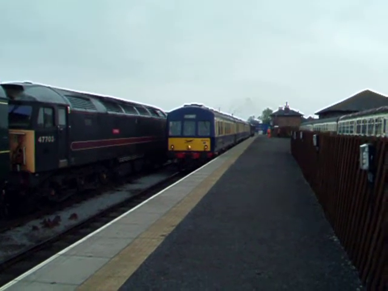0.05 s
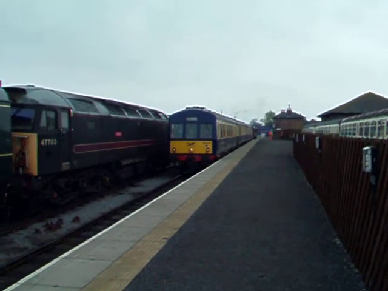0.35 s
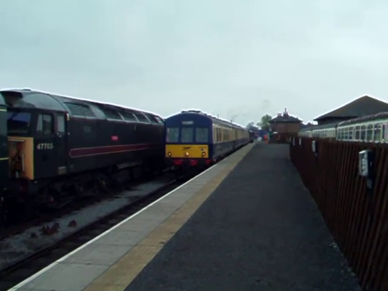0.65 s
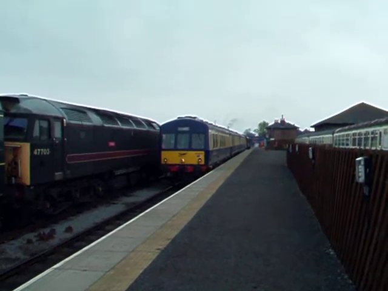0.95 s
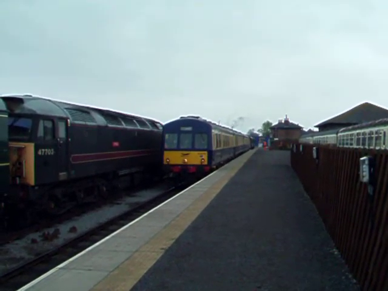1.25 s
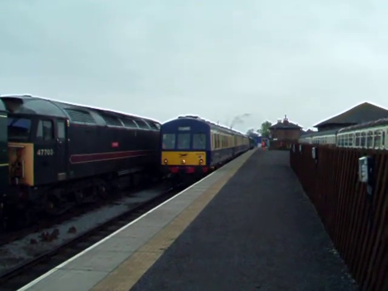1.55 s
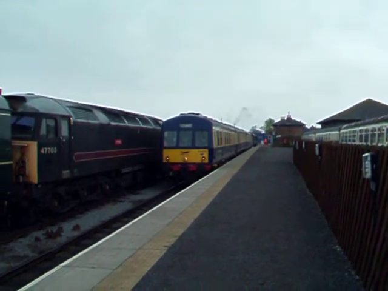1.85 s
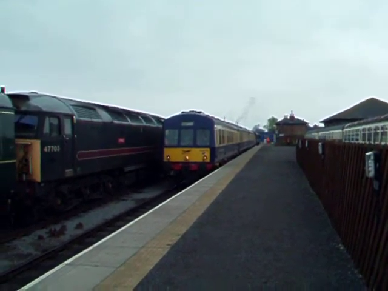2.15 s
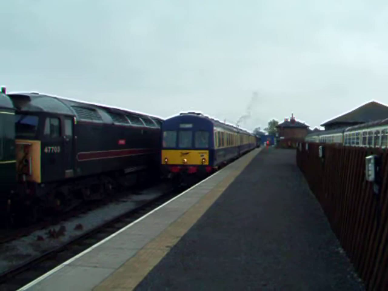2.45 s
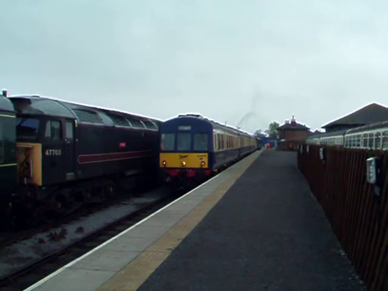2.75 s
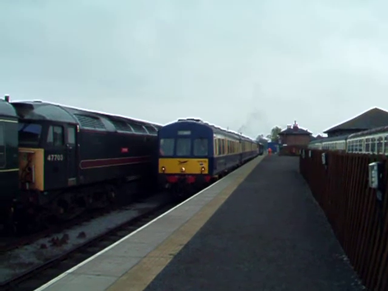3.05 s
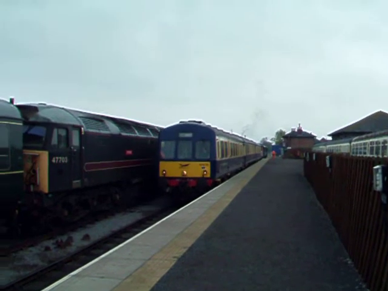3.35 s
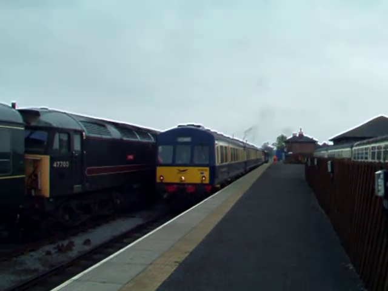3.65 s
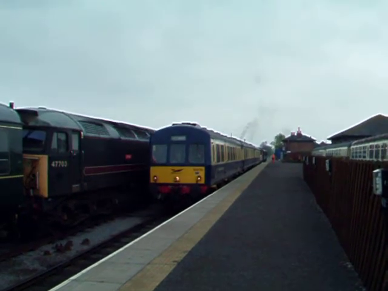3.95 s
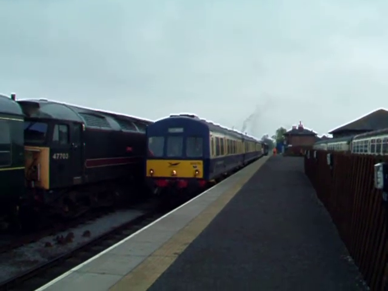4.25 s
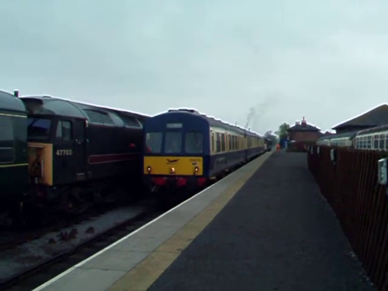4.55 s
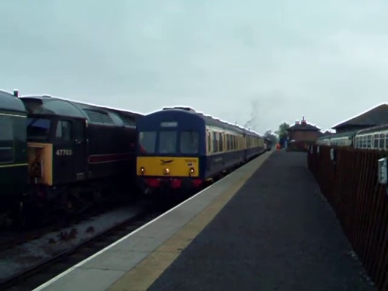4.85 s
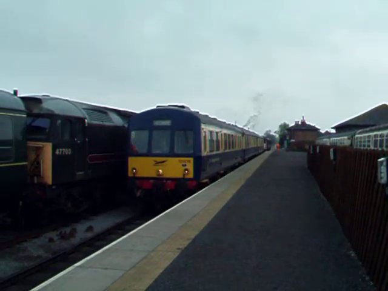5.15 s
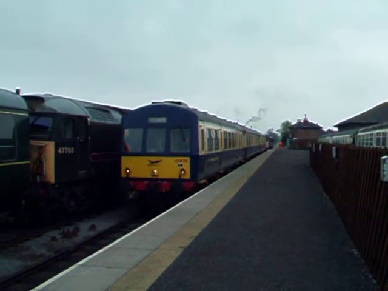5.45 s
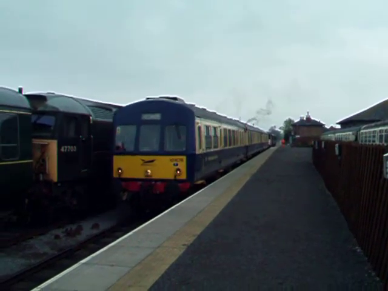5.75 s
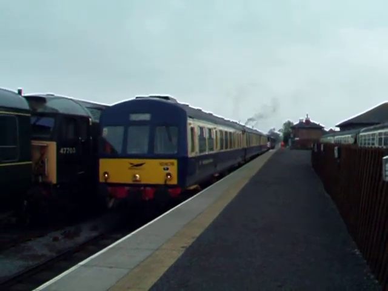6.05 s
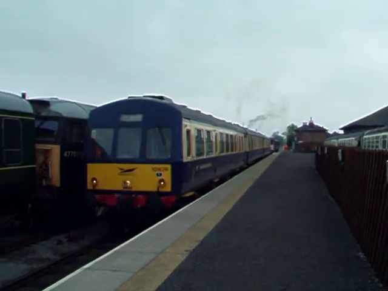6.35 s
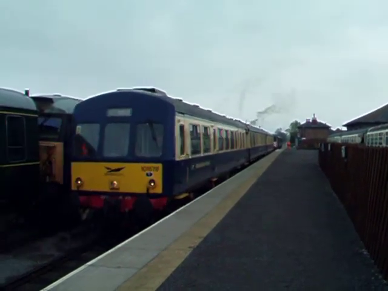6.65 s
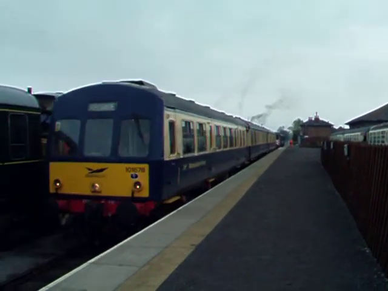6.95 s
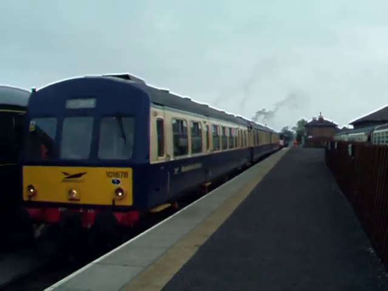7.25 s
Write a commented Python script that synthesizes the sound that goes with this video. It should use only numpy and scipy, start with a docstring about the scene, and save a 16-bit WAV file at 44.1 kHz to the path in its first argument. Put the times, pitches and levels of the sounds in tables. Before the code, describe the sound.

A diesel railcar drones and rumbles as it moves along an open station platform towards the microphone, with a light clatter, hiss and a faint high whine. Wind buffets the microphone throughout, with irregular flaps and pops that are strongest from about 1 to 3 seconds and sparser later. From around 3 seconds the train grows steadily louder. Between 4 and 6 seconds its two engines speed up, their drone rising in pitch and swelling in surges while clatter, hiss and ringing metal panels build. A few sharp metal cracks come at about 5 seconds. Brief high chirps from the running gear follow, near 5, 6 and 7 seconds. At about 7.2 seconds a wheel knocks over a rail joint, and the train is at its closest and loudest as the sound ends just after.

```python
"""A diesel railcar pulls out along a station platform and comes towards the microphone. Its two underfloor
engines drone through their exhaust pipes and speed up under a growing clatter and hiss. Panels ring, the
exhaust cracks, metal chirps, and a wheel knocks over a rail joint. All the while, gusts of wind push small
swirls of air across the microphone, which flap and pop."""
import sys
import numpy as np
from scipy import signal
from scipy.fft import rfft, irfft
from scipy.io import wavfile
from scipy.ndimage import uniform_filter1d

SR = 44100
rng = np.random.default_rng(int(sys.argv[2]) if len(sys.argv) > 2 else 0)


def digitize_waveform(pressure):
    """Quantize a signal to 16-bit integers and store it at the path in sys.argv[1].

    Rows of a 2-D input are taken as channels; values are limited to [-1, 1].
    """
    field = np.atleast_2d(pressure).T
    bounded = np.clip(field, -1, 1)
    quanta = np.round(bounded * 32767).astype(np.int16)
    wavfile.write(sys.argv[1], SR, quanta)


N = 325899
T = np.arange(N) / SR

# How fast each engine runs. Each row: time in seconds, firings per second.
FRONT_SPEED = [(0, 30.5), (2.6, 31.2), (4.1, 34.8), (4.6, 37.3), (4.95, 39.8), (5.2, 40.8), (6.1, 46.4),
               (6.6, 44.6), (7.39, 45.4)]
REAR_SPEED = [(0, 31.8), (3, 32.6), (4.2, 37), (5.0, 44.8), (5.3, 47), (5.65, 49), (7.39, 51.1)]
# When each engine's exhaust drone swells louder.
# Each row: start in seconds, length in seconds, level in dB.
FRONT_SWELLS = [(4.08, .55, -27), (4.93, 0.2, -25.5), (5.8, 0.32, -26.5), (6.9, 0.11, -23.5)]
REAR_SWELLS = [(5.3, 0.38, -26), (5.85, .4, -29.5), (6.85, 1, -29.5)]
# Where an exhaust pipe rings. Each row: pitch before tuning in Hz, width in Hz, relative level in dB.
PIPE_RINGS = [(191, 48.4, 8), (45.7, 14, -10.5), (320, 100, -25.5), (490, 140, -26)]
# The train gets louder as it comes closer. Each row: time in seconds, relative level in dB.
APPROACH = [(0.0, -48), (1.48, -43.5), (2.0, -49), (2.7, -45.5), (3.15, -47), (5.18, -39), (6.81, -37),
            (7.39, -33.5)]
# The tone colours of four engine noises. Each row: frequency in Hz, relative level in dB.
RUMBLE_COLOUR = [(18, -13.5), (32, -13.5), (60, -7.5), (100, -7), (135, 1.5), (185, 2.5), (260, -1.5),
                 (400, -7.5), (600, -12), (850, -11.5), (1300, -23.5), (2500, -64.5)]
CLATTER_COLOUR = [(300, 9.5), (750, 4.5), (950, -1.5), (1120, 5), (1350, 6), (1620, 6.5), (1950, 3),
                  (2330, 4), (2560, -9), (2720, -17), (3100, -21), (4500, -40)]
HISS_COLOUR = [(1500, 3), (2600, -1.5), (3100, 0.5), (3370, 1.5), (3600, 4), (4000, 3.5), (4600, 1),
               (5100, -16), (5800, 4), (6250, 3), (7300, 0), (8000, -6.5), (8500, -17.5), (8950, -39)]
AIR_RUSH_COLOUR = [(3100, -32), (3300, -3.5), (3430, -10), (3650, -22), (4400, -18), (4750, -1.5),
                   (4950, 0.5), (5400, 1.5), (5600, -3.5), (6000, -40)]
# Where panels and pipework ring. Each row: pitch in Hz, width in Hz, relative level in dB.
PANEL_RINGS = [(820, 160, -4.5), (1112, 110, -2.5), (1670, 170, -10), (2232, 260, -6.5), (2524, 120, -9),
               (3250, 370, -18.5), (3900, 36, -17.5), (4340, 39, -22.5), (5005, 330, -11.5)]
# Cracks of the exhaust, and wheel blows on the rail joint. Each row: start in seconds, level in dB.
CRACKS = [(4.928, -22), (4.953, -15.5), (5.0035, -11.5), (5.152, -17.5)]
JOINT_BLOWS = [(7.159, -18), (7.173, -13.5), (7.185, -17), (7.22, -24)]
# The tone colour of the exhaust cracks, and how wheel and rail ring. Each row: frequency in Hz, relative level
# in dB.
CRACK_COLOUR = [(100, -11), (250, 3), (550, -4), (850, 15.5), (1050, 0), (1200, 3), (1600, -8), (1900, 4.5),
                (2300, 1.5), (2560, -14), (2800, -30), (4500, -43)]
WHEEL_COLOUR = [(120, -18), (220, 4.5), (330, 19.5), (480, -22), (800, 2), (1400, 5), (2300, -2),
                (2900, -8.5), (3900, -2.5), (4500, -3.5), (5300, -8), (6400, -11), (8000, -27), (8900, -49)]
# Chirps of the running gear. Each row: time of the peak in seconds, level in dB.
CHIRPS = [(2.775, -38), (5.12, -34), (5.79, -32), (5.95, -33), (6.94, -29), (7.04, -28), (7.26, -30)]
# The tones of a faint whine. Each row: pitch in Hz, level in dB.
WHINE_TONES = [(3118, -64.5), (3705, -67), (5022, -76.5), (6568, -58.5), (7156, -66.5)]
# The hardest flaps of wind. Each row: start in seconds, length in seconds, level in dB,
# brightness in Hz (each swirl's own brightness is scaled from it).
FLAPS = [(.045, .04, -24.5, 490), (.287, 0.0062, -22, 590), (0.336, 0.054, -26, 440),
         (1.009, .02, -22, 248), (1.076, 0.019, -17, 362), (1.102, .04, -21, 363), (1.202, 0.021, -19, 310),
         (1.308, 0.04, -21.5, 390), (1.478, 0.016, -18.5, 564), (1.504, 0.0051, -9, 420),
         (1.527, 0.0091, -13, 444), (1.569, 0.04, -18.5, 460), (1.615, .02, -13.5, 590),
         (1.644, .018, -15, 537), (1.663, 0.0035, -9, 990), (1.708, 0.0061, -20.5, 776),
         (1.826, 0.0072, -15.5, 610), (1.838, 0.0089, -26, 870), (1.906, .03, -23.5, 514),
         (2.029, 0.016, -15.5, 770), (2.047, 0.014, -16.5, 840), (2.138, .009, -24, 530),
         (2.167, 0.057, -22, 440), (2.233, .009, -22.5, 310), (2.29, 0.0075, -23, 553),
         (2.529, .006, -14.5, 550), (2.594, 0.041, -24, 430), (2.716, 0.0095, -13.6, 670),
         (2.727, .027, -19.5, 610), (2.828, 0.033, -19, 348), (2.869, 0.0089, -15.5, 765),
         (2.895, 0.015, -17, 710), (2.929, 0.058, -16.5, 605), (3.184, 0.01, -15.5, 510),
         (3.261, .018, -21.5, 325), (3.305, .04, -21.5, 430), (3.409, 0.039, -21.5, 610),
         (3.495, 0.02, -25.5, 400), (3.62, .04, -24.5, 540), (3.817, .2, -25.5, 500),
         (4.019, .01, -26, 790), (4.14, 0.033, -20, 450), (4.255, .01, -20.5, 670),
         (4.447, 0.0098, -16.5, 590), (4.558, .045, -22, 278), (4.771, 0.028, -20.5, 196),
         (4.896, .043, -21.5, 280), (5.807, .037, -17.5, 356), (6.147, .008, -19, 260),
         (6.417, 0.015, -15, 350), (6.86, 0.049, -24, 540)]
# Gusts. Each row: start in seconds, length in seconds, relative buffeting and flutter levels in dB.
GUSTS = [(0, 0.53, -34, -31.5), (1.04, 0.59, -21.5, -30.5), (1.692, 0.11, -35, -27.5),
         (2.542, 0.66, -39, -30.5), (3.05, .55, -43, -31), (3.78, 0.43, -26, -22.5),
         (4.65, 0.42, -28.5, -30.5), (5.2, 0.27, -27.5, -37.5), (6.101, 0.23, -26, -34.5),
         (6.864, 0.23, -25.5, -27)]
# The tone colour of the wind's low buffeting. Each row: frequency in Hz, relative level in dB.
BUFFET_COLOUR = [(12, -25.5), (28, -0.5), (50, 9.5), (100, 15), (170, 9.5), (300, -4.5), (700, -52.5)]


def exhaust(firings, drone_level, tuning, roughness=0.35, waver_db=3.0):
    """Multiples of the firing rate swell as they climb through the pitches at which the pipe rings."""
    firing_hz, drone = np.gradient(firings) * SR, np.zeros(N)
    for harmonic in range(1, 14):
        power = sum(amp(2 * db) / (1 + (2 * (harmonic * firing_hz - hz * tuning) / width) ** 2) ** 2
                    for hz, width, db in PIPE_RINGS)
        drone += np.sqrt(power) * np.cos(2 * np.pi * (harmonic * firings + rng.random()))
    drone /= np.sqrt(uniform_filter1d(drone ** 2, size=8000))  # even out the level; the swells set it
    strength = 1 + roughness * drift(72)  # no two firings are equally strong
    return drone * strength * drone_level * amp(waver_db * drift(22))


def count_firings(speed):
    """Counts how often an engine's cylinders have fired so far; its speed wanders a little."""
    return np.cumsum(curve(speed) * (1 + .008 * drift(14))) / SR


def machinery(firings, drone_level, beat_depth=0.15, throb_hz=8.3):
    """Rumble swells with the drone, clatter and rushing air beat with the firings, hiss lies on top."""
    beat = 1 + beat_depth * np.cos(2 * np.pi * firings)
    near_db = nearness()  # each noise grows with this at its own rate
    rumble = noise(RUMBLE_COLOUR) * amp(-31 + .87 * near_db) * unit(drone_level) ** .29
    clatter = noise(CLATTER_COLOUR) * beat * amp(-34.5 + .86 * near_db + .6 * drift(8.6))
    hiss = noise(HISS_COLOUR) * amp(-43 + near_db)
    throb = np.sin(2 * np.pi * np.cumsum(throb_hz * (1 + .3 * drift(4))) / SR)
    flutter = amp(1.7 * throb + 1.5 * drift(25))
    air_rush = noise(AIR_RUSH_COLOUR) * beat * flutter * amp(-46 + 1.05 * near_db)
    return rumble + clatter + hiss + air_rush


def nearness():
    """How many dB the train's approach lies above its average."""
    db = curve(APPROACH)
    return db - db.mean()


def panels(rattle_db=3.0):
    """The shaking of the engines keeps metal panels ringing, each swelling on its own."""
    rings = sum(ringing(hz, width) * amp(db + rattle_db * drift(20)) for hz, width, db in PANEL_RINGS)
    return rings * amp(-44 + .99 * nearness())


def ringing_blows(rows, ring_colour, fade_s, rise_s=0.00044, samples=12000):
    """Each blow sets off a dense ring that drops by 60 dB in fade_s seconds."""
    out, t = np.zeros(N), T[:samples]
    for start, db in rows:
        ring = colour(rng.standard_normal(samples), ring_colour)
        add(out, start, ring * amp(db - 60 * t / fade_s) * (1 - np.exp(-t / rise_s)))
    return out


def chirps(hz=5300, width_hz=280, swell_s=0.003):
    """The running gear chirps in short swells of a high, fuzzy metal ring."""
    f = np.fft.rfftfreq(N, 1 / SR)
    band = np.exp(-((f - hz) / width_hz) ** 2)
    ring = unit(irfft(rfft(rng.standard_normal(N)) * band, N))
    return ring * sum(amp(db) * np.exp(-((T - peak) / swell_s) ** 2) for peak, db in CHIRPS)


def gear_whine(waver_db=3):
    """A thin, fuzzy whine, perhaps of the gears, that stands out as the train comes near."""
    return ringing(hz=3380, width_hz=70) * amp(-59 + 1.55 * nearness() + waver_db * drift(11))


def steady_whine():
    """Faint, high tones that never change."""
    return sum(np.sqrt(2) * amp(db) * np.sin(2 * np.pi * (hz * T + rng.random()))
               for hz, db in WHINE_TONES)


def wind_flaps(swirls_per_s=520, ragged_db=5, arch_db=3, lead_db=3, lead_s=.005):
    """A flap is a tight bunch of air swirls: the strongest sound sharp, the weakest dull."""
    out, lead_in = np.zeros(N), 600  # samples of room before each flap
    for start, length, db, hz in FLAPS:
        count = max(1, round(length * swirls_per_s))
        along = (np.arange(count) + rng.uniform(.1, .9, count)) / count  # 0 to 1 through the flap
        scatter_db = ragged_db * np.clip(rng.standard_normal(count), -2, 2)
        sizes = amp(scatter_db + arch_db * np.sin(np.pi * along))
        sizes *= amp(lead_db * np.exp(-along * length / lead_s))  # the first swirls get an extra push
        arrivals = lead_in + (along * length * SR).astype(int)
        burst = np.zeros(4096 + int(length * SR))
        strong_to_weak = np.array_split(np.argsort(-sizes), 3)
        for group, speed in zip(strong_to_weak, (1.25, .68, .34)):
            kicks = np.zeros(len(burst))
            kicks[arrivals[group]] = sizes[group] * rng.choice([-1, 1], len(group))
            burst += swirls(kicks, hz * .93 * speed) / speed ** 1.27  # slow swirls push for longer
        add(out, start - lead_in / SR, unit(burst) * np.sqrt(length * SR / len(burst)) * amp(db))
    return out


def wind_gusts(flutter_hz=400, swirls_per_s=320, lump_db=0.85, clump_db=4.5):
    """Each gust brings low, lumpy buffeting and a flutter of small swirls that come in clumps."""
    gusts = np.array(GUSTS)
    buffet_gain = swells(gusts[:, [0, 1, 2]], rest_db=-37.5, rise_s=.082, fall_s=.085)
    flutter_gain = swells(gusts[:, [0, 1, 3]], rest_db=-44, rise_s=.082, fall_s=.085)
    buffet = noise(BUFFET_COLOUR) * buffet_gain * amp(lump_db * drift(30))
    clumps = amp(clump_db * np.clip(drift(60), -2, 2))
    kicks = rng.choice([-1, 1], N) * (rng.random(N) < swirls_per_s / SR) * clumps
    flutter = unit(swirls(kicks, flutter_hz)) * flutter_gain
    return (buffet + flutter) * amp(-2)


def swirls(kicks, hz, leak_hz=125):
    """Each swirl crossing the microphone is one smooth pressure swing; fast ones are brighter."""
    f = np.fft.rfftfreq(len(kicks), 1 / SR)
    leak = (1j * f / (leak_hz + 1j * f)) ** 2  # slow swings leak away
    swing = 1j * (f / hz) ** .35 * np.exp(-.5 * (f / hz) ** 1.65)
    lag = (hz - 1j * f) / (hz + 1j * f)  # the lows trail the sharp edge
    return irfft(rfft(kicks) * leak * swing * lag, len(kicks))


def swells(rows, rest_db, rise_s, fall_s):
    """A gain that rises from rest, holds and falls back for each row of start, length and level."""
    gain = amp(rest_db)
    for start, length, db in rows:
        shape = np.exp(np.minimum(T - start, 0) / rise_s - np.maximum(T - start - length, 0) / fall_s)
        gain = np.hypot(gain, amp(db) * shape)
    return gain


def ringing(hz, width_hz):
    """Noise narrowed to a fuzzy tone around one pitch."""
    f = np.fft.rfftfreq(N, 1 / SR)
    return unit(irfft(rfft(rng.standard_normal(N)) / (1 + ((f - hz) / width_hz * 2) ** 2), N))


def noise(outline):
    """Steady noise of a given tone colour."""
    return colour(rng.standard_normal(N), outline)


def colour(sound, outline):
    """Shapes a sound's lows and highs by a colour table, at an average size of 1."""
    hz, db = np.transpose(outline)
    f = np.fft.rfftfreq(len(sound), 1 / SR)
    gain = amp(np.interp(np.log(f + 1), np.log(hz), db))
    return unit(irfft(rfft(sound) * gain, len(sound)))


def drift(rate, points=4096):
    """A random wobble of average size 1, with up to about rate changes a second."""
    f = np.fft.rfftfreq(points, T[-1] / points)
    slow = irfft(rfft(rng.standard_normal(points)) * np.exp(-(f / rate) ** 2) * (f > 0))
    return np.interp(T, np.linspace(0, T[-1], points), unit(slow))


def curve(rows):
    """Joins rows of time and value with straight lines."""
    return np.interp(T, *np.transpose(rows))


def amp(db):
    """Turns decibels into a gain."""
    return 10 ** (np.asarray(db) / 20)


def unit(sound):
    """Scales a sound to an average size (root mean square) of 1."""
    return sound / np.sqrt(np.mean(sound ** 2) + 1e-20)


def add(mix, start_s, sound):
    """Mixes a sound in at its start time."""
    part = mix[max(round(start_s * SR), 0):][:len(sound)]
    part += sound[:len(part)]


def scene():
    """The train, its knocks and the wind, at one microphone."""
    front, rear = count_firings(FRONT_SPEED), count_firings(REAR_SPEED)
    front_level, rear_level = (swells(rows, rest_db=-43, rise_s=.096, fall_s=.11)
                               for rows in (FRONT_SWELLS, REAR_SWELLS))
    drone = exhaust(front, front_level, tuning=.945) + exhaust(rear, rear_level, tuning=1.06)
    train = drone + machinery(front, front_level + rear_level) + panels() + chirps() + gear_whine()
    cracks = ringing_blows(CRACKS, CRACK_COLOUR, fade_s=.043)
    rail_joint = ringing_blows(JOINT_BLOWS, WHEEL_COLOUR, fade_s=.14)
    return (train + cracks + rail_joint + steady_whine() + wind_gusts() + wind_flaps())[None]


def record(dry, limit=.72, top_hz=8950):
    """Only the hardest pops are too loud for the microphone; then the highest treble is cut away."""
    clipped = np.clip(dry, -limit, limit)
    treble_cut = signal.firwin(511, top_hz, window=("kaiser", 9), fs=SR)
    return signal.oaconvolve(clipped, treble_cut[None], "same")


dry = scene()
out = record(dry)
digitize_waveform(out)
```